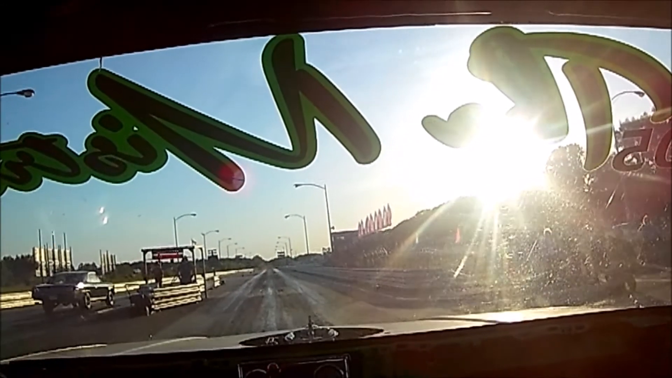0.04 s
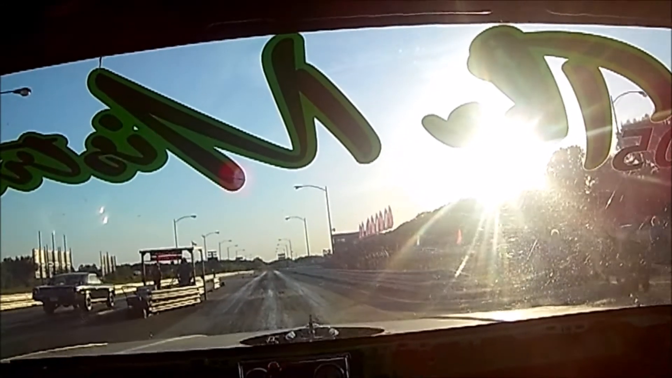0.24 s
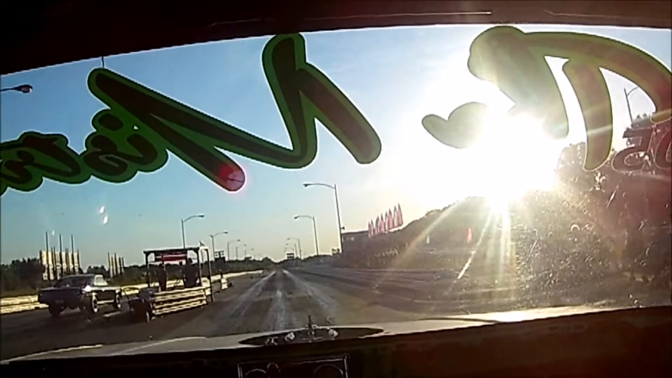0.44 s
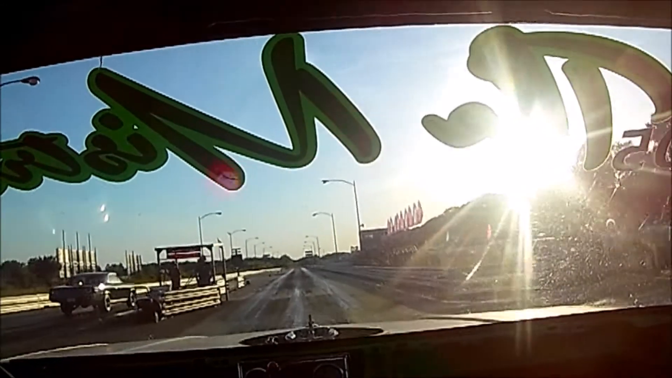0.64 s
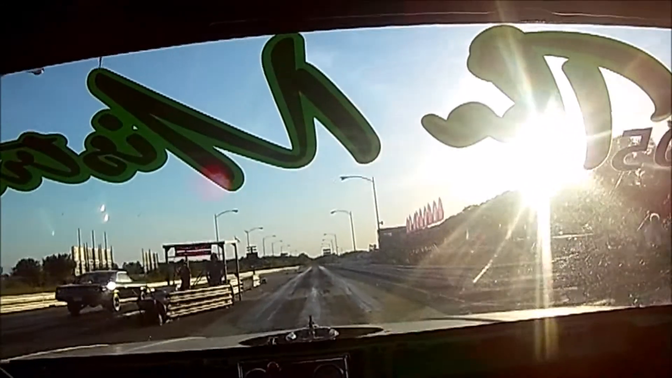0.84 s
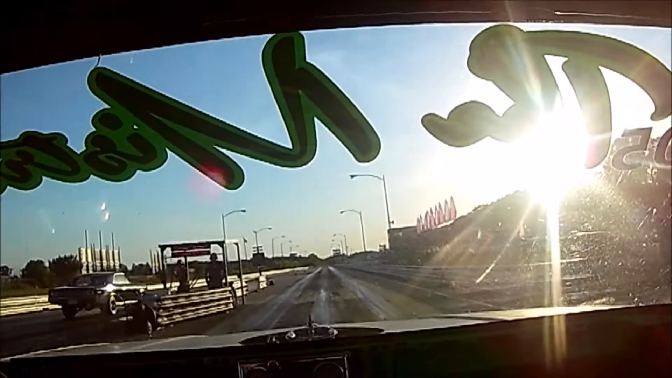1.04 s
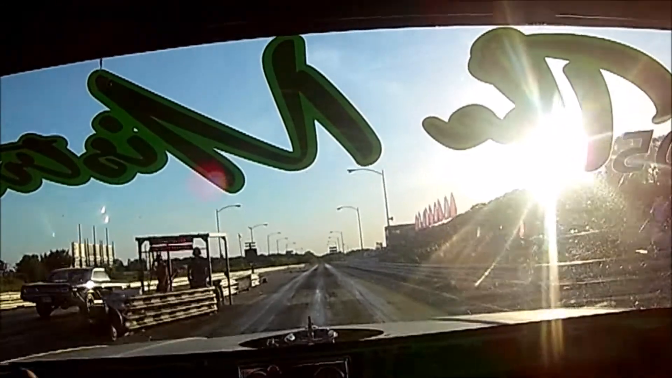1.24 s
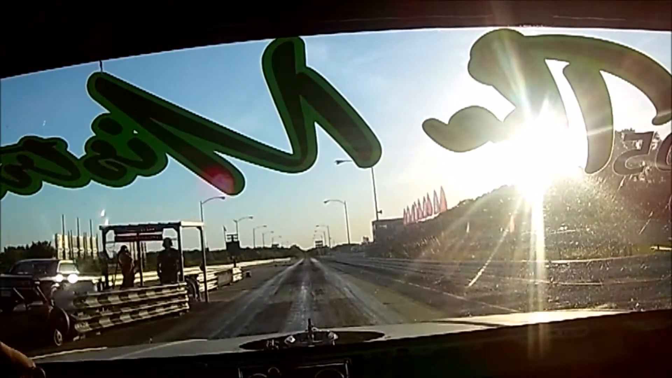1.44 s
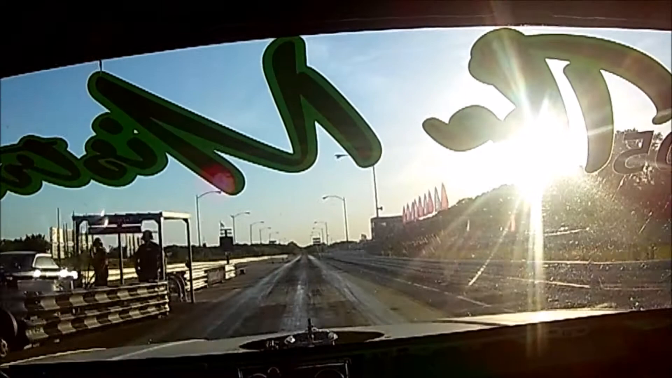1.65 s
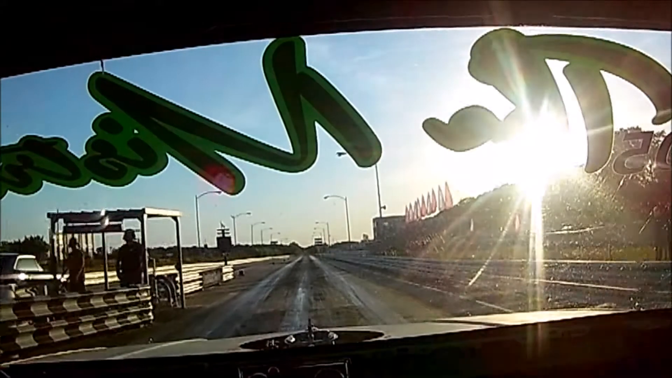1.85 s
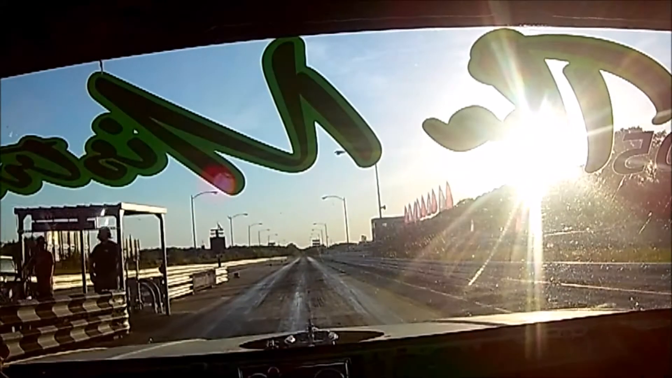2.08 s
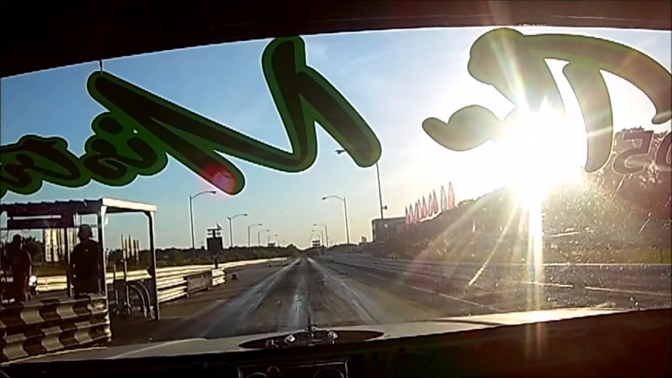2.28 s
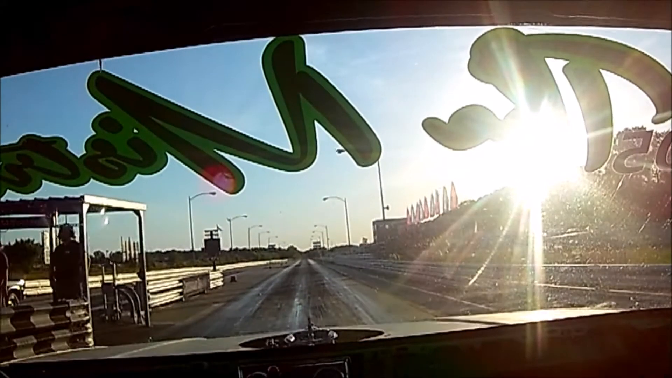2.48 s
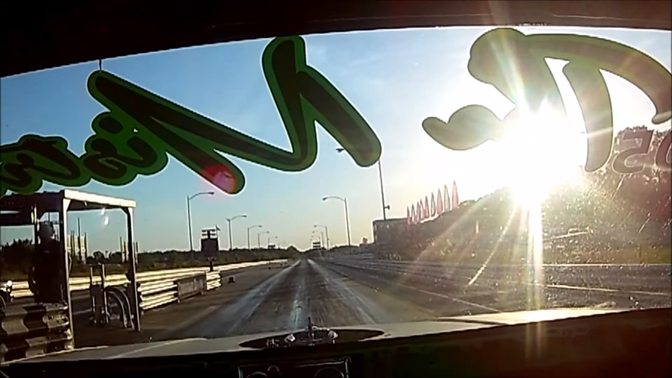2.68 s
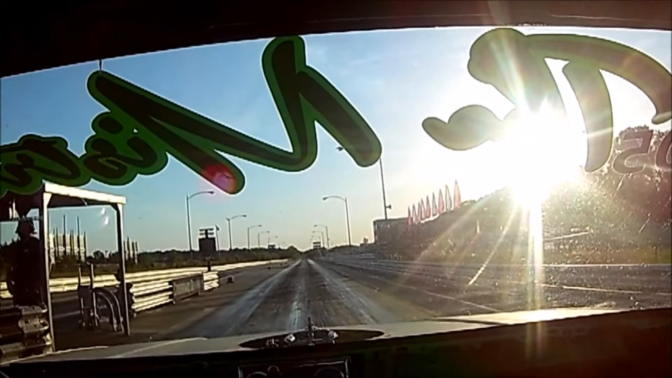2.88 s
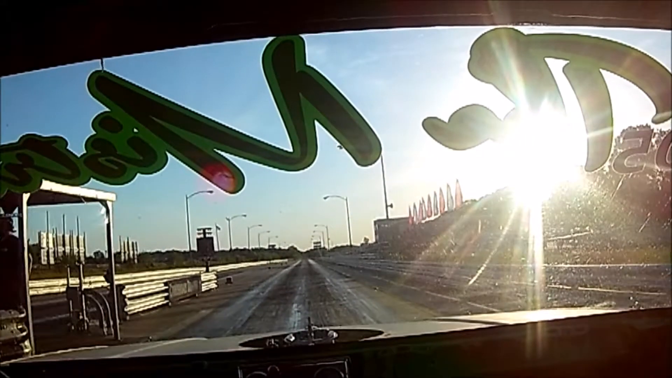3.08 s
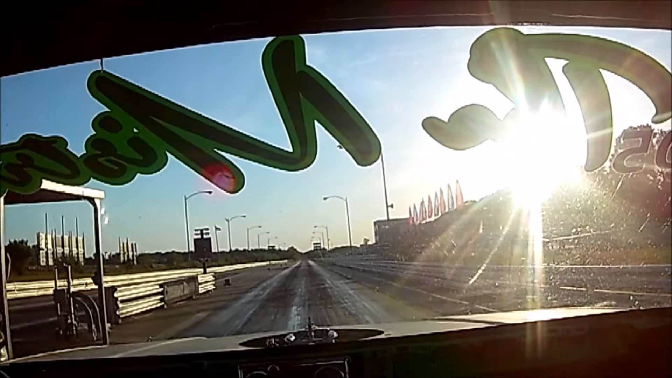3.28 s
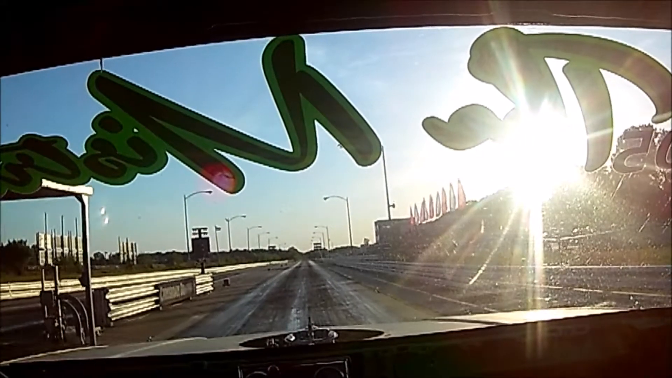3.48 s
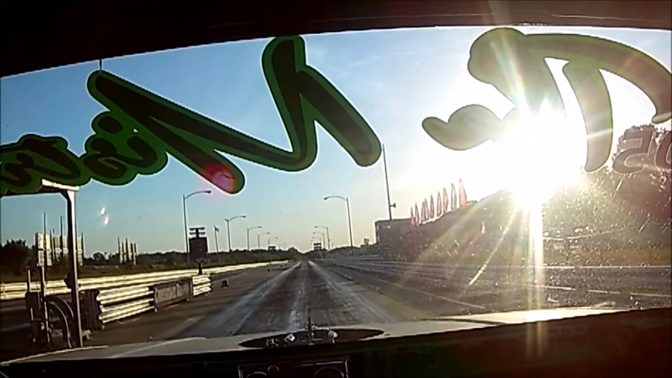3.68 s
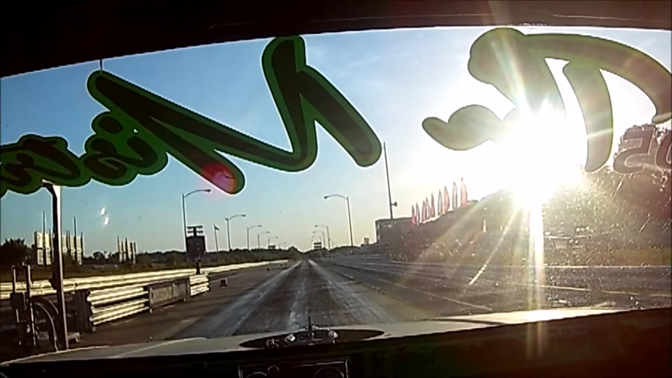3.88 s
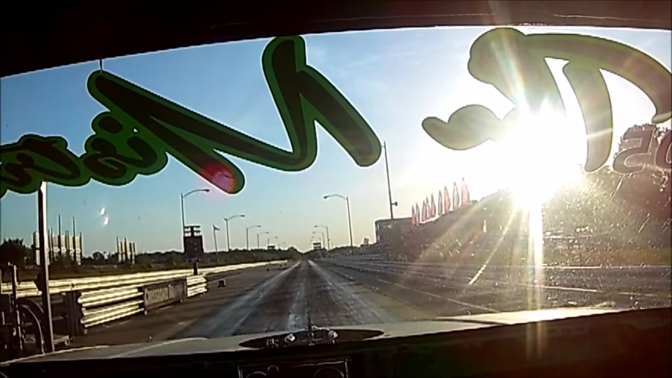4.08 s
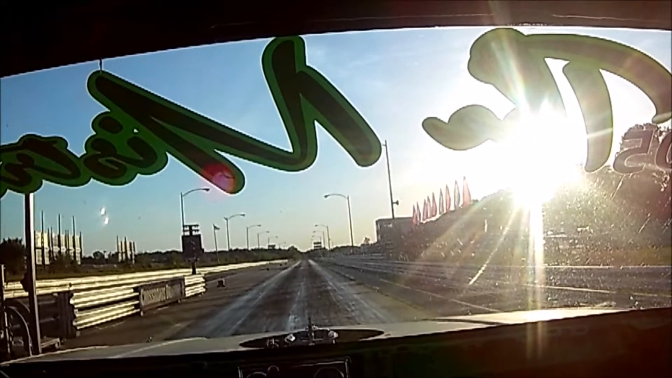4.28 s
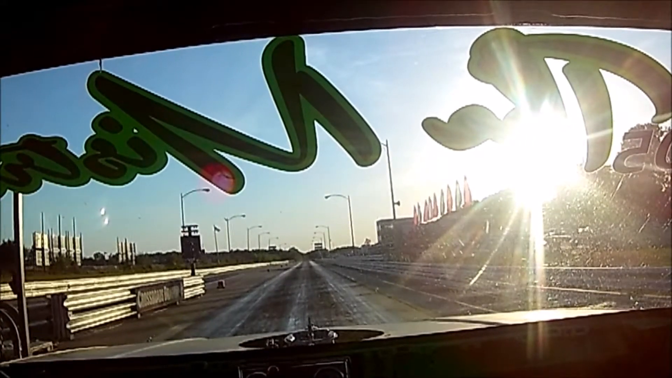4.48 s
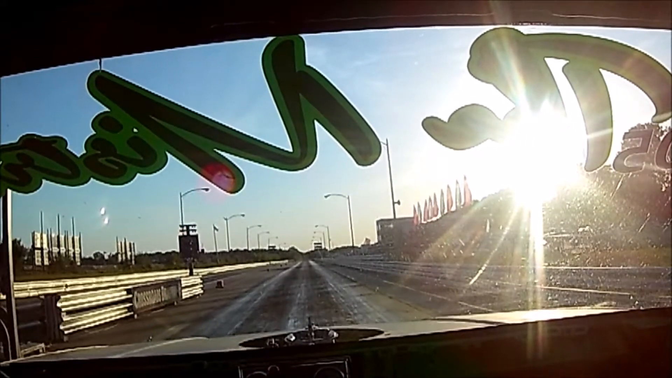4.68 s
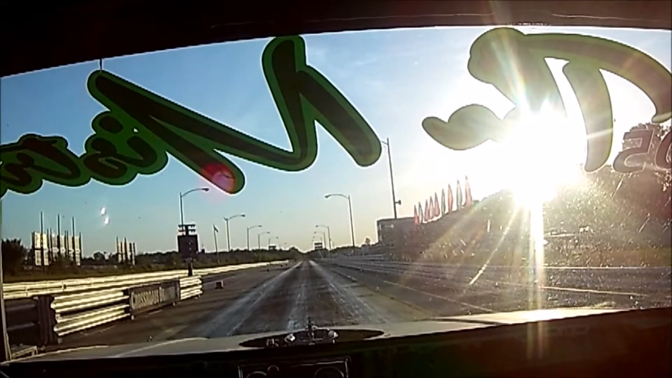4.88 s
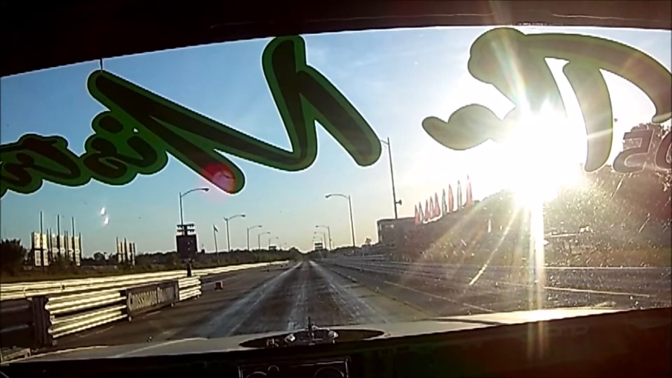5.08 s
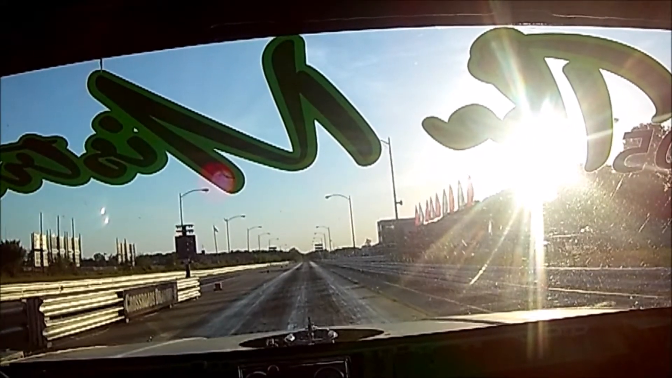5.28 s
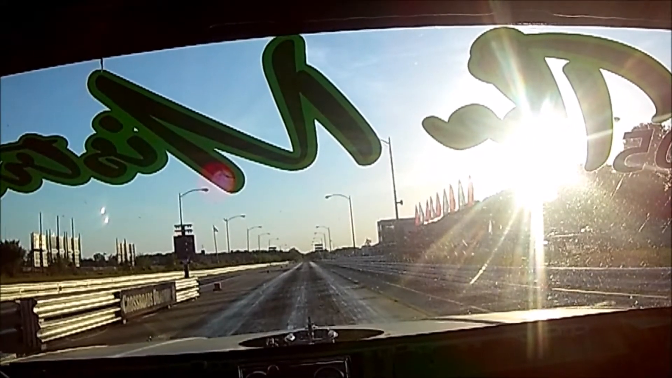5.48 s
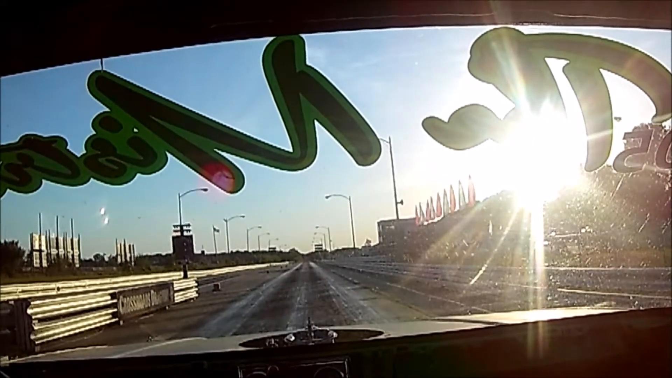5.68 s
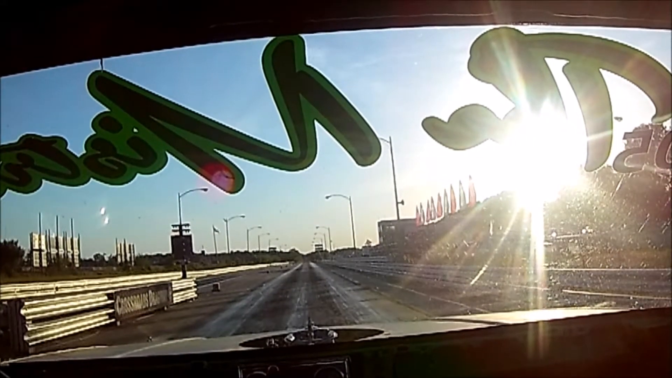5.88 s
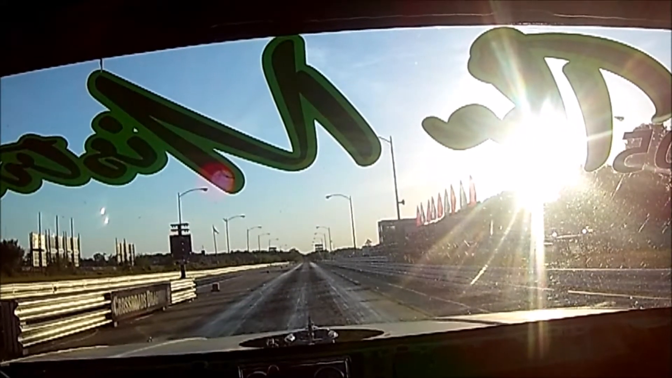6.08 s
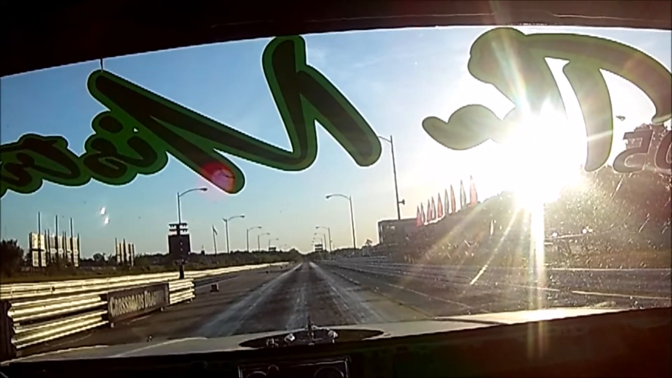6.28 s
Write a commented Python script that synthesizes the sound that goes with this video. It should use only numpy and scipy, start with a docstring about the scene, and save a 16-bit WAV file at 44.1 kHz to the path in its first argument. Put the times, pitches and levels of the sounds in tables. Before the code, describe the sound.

Inside a car on a drag strip, a big V8 with open exhausts roars loudly for about a second, dipping and rising in pitch with a brief tyre hiss. The throttle snaps shut, the revs tumble with heavy thumps and one dull pop, and a far quieter, uneven idle remains, booming and ticking. The close cabin microphone overloads on the loudest peaks.

```python
"""A big V8 with open exhausts, heard from the driver's seat at a drag strip.
It roars through the end of a burnout, built from steady tones plus cracks and puffs of gas at each firing.
At about 1.1 s the throttle shuts and the revs fall, with one pop in the pipe, to a rough, loping idle.
Off the throttle, uneven firings boom in the cabin, with a deep note, pipe burble and chuffs.
Behind them the valve train ticks as band-passed noise puffs, and the tyres scrub as a high hiss."""
import sys
import numpy as np
from scipy import signal
from scipy.fft import rfft, irfft
from scipy.io import wavfile
from scipy.ndimage import uniform_filter1d

SR = 44100
rng = np.random.default_rng(int(sys.argv[2]) if len(sys.argv) > 2 else 0)


def digitize_waveform(pressure):
    """Quantize a signal to 16-bit integers and store it at the path in sys.argv[1].

    Rows of a 2-D input are taken as channels; values are limited to [-1, 1].
    """
    field = np.atleast_2d(pressure).T
    bounded = np.clip(field, -1, 1)
    quanta = np.round(bounded * 32767).astype(np.int16)
    wavfile.write(sys.argv[1], SR, quanta)


N = 279594
T = np.arange(N) / SR  # time of every sample, s

# Engine speed in the burnout: time_s, firings_hz
BURNOUT_SPEED = [(0, 378), (.14, 354), (.3, 305), (.39, 297.5), (.58, 310), (.83, 314.5), (.9, 325),
                 (1.0, 347), (1.06, 354), (1.12, 338)]
# Engine speed at idle, which hunts a little: time_s, firings_hz
IDLE_SPEED = [(2.6, 60), (3.4, 64.03), (3.7, 59.88), (4.2, 58.82), (4.65, 61.4), (5.0, 60.5), (5.35, 62.52),
              (5.7, 59.5), (6.0, 59.37), (6.34, 66)]
# Exhaust tones under load: multiple_of_eight_cylinder_cycle, relative_level_db
EXHAUST_ORDERS = [(1, -31), (2, -22), (3, -8), (4, -22), (5, -6), (6, -21), (7, -23), (8, 0), (9, -15),
                  (10, -15), (11, -19), (12, -29), (13, -22), (14, -20), (15, -13), (16, -16), (17, -19),
                  (18, -18), (19, -20), (20, -11), (21, -10), (22, -19), (23, -20), (24, -21), (25, -12),
                  (26, -23), (27, -19), (28, -13), (29, -17), (30, -12), (31, -17), (32, -19), (33, -23),
                  (34, -21), (35, -17), (36, -8), (37, -14), (38, -10), (39, -17), (40, -20), (41, -11),
                  (42, -19), (43, -20), (44, -20), (45, -20), (46, -20)]
# Cylinders in firing order: strength_db, extra_path_to_cabin_s
CYLINDERS = [(0, 0.00063), (-1.5, 0), (-4, 0), (-7, 0.0016), (-1, 0.00057), (-7.5, 0.00099), (-14, 0.0015),
             (-4, 0)]
# How evenly the engine fires under load: time_s, share_of_rasp_power_that_is_clean_tone (0-1)
EVENNESS = [(0, .55), (.33, .4), (.52, .84), (.82, .84), (.9, .5), (1.04, .5), (1.12, .1)]
# How hard the engine works in the burnout: time_s, rasp_level_db (each layer adds a small trim)
EFFORT = [(0.0, -12.5), (0.208, -15.5), (0.372, -14.5), (0.498, -10.5), (0.87, -10), (0.914, -6),
          (1.06, -9)]
# Low tones in the burnout: time_s, low_orders_db, firing_note_db (each gets a small trim)
LOW_TONES = [(0.0, -8, -11.5), (0.074, -18, -17), (0.136, -8.5, -9), (0.17, -8.5, -15.5),
             (0.236, -15.5, -15.5), (0.626, -13, -13.5), (0.722, -21, -13.5), (0.744, -20, -12),
             (1.12, -13, -17.5)]

# Tone colours, the broad shape of each layer's spectrum: pitch_hz, level_db
ROAR_COLOUR = [(40, -18.5), (110, 2), (190, 3.5), (250, -4.5), (370, 4), (470, -11.5), (600, -1),
               (1100, -2.5), (1550, -1.5), (2100, -11.5), (2750, -19.5), (3500, -6), (4500, -17),
               (6200, -22.5), (7800, -41), (11500, -38.5), (15000, -59)]
BOOM_COLOUR = [(20, -45), (45, -14), (70, -18), (84, -8), (100, 4), (128, -1.5), (160, -8.5), (185, -5),
               (222, -22), (300, -45.5), (440, -39.5), (800, -90), (4000, -110)]
BURBLE_COLOUR = [(30, -60), (200, -26), (260, -8), (300, 0), (345, -1), (390, -1), (440, -17), (700, -40),
                 (4000, -100)]
CLATTER_COLOUR = [(200, -9.5), (450, -13), (730, -0.5), (930, -7.5), (1450, 0.5), (1720, -2), (2100, -10.5),
                  (2770, -17.5), (3550, -6), (4300, -15.5), (6000, -22.5), (7000, -28), (7600, -36),
                  (10000, -32), (14300, -37.5)]
DRONE_COLOUR = [(40, -0.5), (130, 1.5), (195, 1), (222, -11), (280, -9)]
# How the pipes colour the upper orders: pitch_hz, level_db
SNARL_COLOUR = [(420, 0), (585, -2.5), (760, 4), (1000, 0.5), (1400, -0.5), (1800, -2)]
# Peaks and dips of the cabin and its panels: pitch_hz, width_hz, gain_db
CABIN_RESONANCES = [(100.9, 4.4, 4.5), (130.64, 12.3, 9.5), (304, 48, 2.5), (547, 56, 6.5), (1127, 90, 5.5),
                    (1316, 29, -12), (1405, 99, 5.5), (1631, 48, 4), (2970, 340, -5), (3273, 65, 7),
                    (5190, 30, 2)]
# Cabin booms and a null that shape the firing note and its octave: pitch_hz, width_hz, gain_db
THROB_MODES = [(59.2, 6, 5), (97, 18, 17.5), (128.3, 7.6, 11.5), (250, 77, -17.5)]

# Tyre hiss as they bite and the car shoots forward: time_s, level_db
SCRUB_LEVEL = [(.75, -49), (1.0, -26), (1.2, -39), (1.45, -85)]
# Heavy lumps, a few cylinders that fire hard and thump the cabin: peak_s, boom_db, pipe_burble_db
LUMPS = [(1.115, -24, -20.5), (1.19, -14, -30), (1.275, -13, -34), (1.36, -13.5, -43), (1.45, -26, -34),
         (1.71, -20.5, -30.5), (2.15, -21, -51), (2.6, -21, -54), (2.94, -21.5, -46), (3.18, -23.5, -45),
         (3.31, -24, -39), (3.43, -19, -46), (3.58, -23, -39), (4.4, -24, -39), (4.78, -16, -40),
         (6.28, -23.5, -38.5)]
# Sharp chuffs from the pipes: peak_s, level_db
CHUFFS = [(2.024, -41), (2.849, -39), (3.02, -43), (3.105, -40), (3.311, -37), (3.567, -40.5),
          (3.631, -40.5), (3.834, -39.5), (4.539, -39.5), (4.693, -39), (4.778, -40), (4.957, -39),
          (5.058, -37.5), (5.16, -41.5), (5.301, -39), (5.553, -41), (6.116, -39.5), (6.18, -39.5),
          (6.284, -35.5)]
# Stumbles, where the engine misses and the level sags: middle_s, depth_db
STUMBLES = [(2.52, 4), (2.75, 3), (3.71, 2.5), (4.06, 3.5), (4.33, 1.5), (4.9, 1.5), (5.23, 1.5), (5.43, 2),
            (5.69, 1.5), (6.03, 1.5)]

# When the throttle starts to shut, and how long it takes
SHUT_S, CLOSING_S = 1.074, 0.079
# The revs drop sharply, then the flywheel coasts: both time constants, and the coasting share of the excess
DROP_S, COAST_S, COAST_SHARE = .065, .49, .5
# Once the throttle shuts the rasp steps down, then dies away
RASP_STEP_DB, RASP_STEP_S, RASP_FADE_DB_PER_S = 4, 0.0071, 56.5
# Basic level at idle, and the rise for every octave of revs above it
BOOM_DB, BOOM_DB_PER_OCTAVE = -24, 4.5
BURBLE_DB, BURBLE_DB_PER_OCTAVE = -41.5, 8.5
CHUFF_DB, CHUFF_DB_PER_OCTAVE = -42, 2.5
TICK_DB, TICK_DB_PER_OCTAVE = -40, 2
# The same for the firing note, then the level of its octave, all before the cabin's booms are added
THROB_DB, THROB_DB_PER_OCTAVE, THROB_OCTAVE_DB = -40.5, 5, -39
# How much of the chuffs' power swing and of the lope the ticking follows
TICK_CHUFF_SHARE, TICK_LOPE_SHARE = 0.31, 0.85
# The lope's flutter: its rate, how far that wanders, and its depth in each layer
LOPE_HZ, LOPE_WANDER_TURNS = 11.3, .2
BOOM_LOPE_DB, BURBLE_LOPE_DB, CHUFF_LOPE_DB = 1.3, 1.9, 1.5
LUMP_RISE_S, LUMP_FALL_S = 0.024, 0.023
CHUFF_RISE_S, CHUFF_FALL_S = 0.017, 0.023
STUMBLE_S = 0.032
EDGE_HZ = 14800  # top of the sound's band


def amp(db):
    """Turns decibels into gain."""
    return 10 ** (np.asarray(db) / 20)


def evened(x):
    """Scales a sound to an average (rms) level of 1."""
    return x / np.sqrt(np.mean(x ** 2) + 1e-20)


def steadied(x, span_s):
    """Keeps the level near rms 1 all along, judged over about span_s at a time."""
    size = max(int(span_s * SR), 8)
    power = uniform_filter1d(uniform_filter1d(x ** 2, size), size)
    return x / np.sqrt(abs(power) + 1e-12)


def curve(rows, column=1):
    """Draws straight lines through one column of a table, with a value at every sample."""
    rows = np.array(rows, float)
    return np.interp(T, rows[:, 0], rows[:, column])


def drift(hz):
    """Random wandering of rms 1, with little change faster than hz."""
    f = np.fft.rfftfreq(N, 1 / SR)
    return evened(irfft(rfft(rng.standard_normal(N)) * np.exp(-(f / hz) ** 2), N))


def swell(peak_s, rise_s, fall_s):
    """A smooth bump of height 1 at peak_s."""
    width_s = np.where(T < peak_s, rise_s, fall_s)
    return np.exp(-.5 * np.minimum(((T - peak_s) / width_s) ** 2, 100))


def cabin(x, colour):
    """Filters a sound with a broad colour and the cabin's resonances on top."""
    size = 16384
    f = np.fft.rfftfreq(size, 1 / SR)
    hz, level_db = np.transpose(colour)
    db = np.interp(np.log(f + 1), np.log(hz), level_db)
    for centre_hz, width_hz, gain_db in CABIN_RESONANCES:
        db = db + gain_db / (1 + (2 * (f - centre_hz) / width_hz) ** 2)
    # folding the cepstrum makes the filter respond only after each sound, never before it
    cepstrum = irfft(np.log(amp(db)))
    cepstrum[1:size // 2] *= 2
    cepstrum[size // 2 + 1:] = 0
    response = irfft(np.exp(rfft(cepstrum)))[:size // 2]
    return signal.oaconvolve(x, response)[:N]


def echoes(x, t60_s, wet_db):
    """Scattered reflections off glass and sheet metal: gliding tones swell and fade in them."""
    t = np.arange(SR // 5) / SR
    hits = rng.random(len(t)) < .05
    taps = rng.standard_normal(len(t)) * hits * amp(-60 * t / t60_s)
    return x + amp(wet_db) * signal.oaconvolve(x, taps / np.linalg.norm(taps))[:N]


def throttle():
    """How open the throttle is, 0-1: wide open, then quickly shut."""
    return np.clip(1 - (T - SHUT_S) / CLOSING_S, 0, 1)


def speed():
    """Firings per second: driven through the burnout, then coasting down to the idle."""
    age, idle = np.maximum(T - BURNOUT_SPEED[-1][0], 0), curve(IDLE_SPEED)
    coasting = COAST_SHARE * np.exp(-age / COAST_S)
    dropping = (1 - COAST_SHARE) * np.exp(-age / DROP_S)
    return idle + (curve(BURNOUT_SPEED) - idle) * (coasting + dropping)


def revs():
    """Octaves of engine speed above the idle."""
    return np.log2(speed() / curve(IDLE_SPEED))


def crank():
    """Running count of firings; the speed trembles slightly."""
    return np.cumsum(speed() * (1 + .002 * drift(40))) / SR


def rasp_db():
    """The rasp follows the effort and dies away when the throttle shuts."""
    age = np.maximum(T - SHUT_S, 0)
    step_db = RASP_STEP_DB * np.minimum(age / RASP_STEP_S, 1)
    return curve(EFFORT) - step_db - RASP_FADE_DB_PER_S * age


def lope(depth_db):
    """Unevenness of the idle in dB: a wandering flutter, and a sag at each stumble."""
    wave = np.sin(2 * np.pi * (LOPE_HZ * T + LOPE_WANDER_TURNS * drift(5.3)))
    flutter = evened(wave + .5 * drift(22))
    sag_db = sum(db * swell(s, STUMBLE_S, STUMBLE_S) for s, db in STUMBLES)
    return depth_db * flutter - sag_db


def pulses(firings, pattern, scatter_db, jitter_s):
    """One click per firing: each cylinder has its own strength and path, and no two burns are alike."""
    at = np.flatnonzero(np.diff(np.floor(firings)) > 0)
    cylinder = firings[at + 1].astype(int) % len(CYLINDERS)
    strength_db, path_s = np.array(CYLINDERS)[cylinder].T
    burn, late = rng.standard_normal((len(at), 2)).T
    delay = np.round((path_s + jitter_s * late) * SR).astype(int)
    place = np.clip(at + delay, 0, N - 1)
    # pattern sets how much of the cylinders' difference in strength is heard
    level_db = pattern * strength_db + scatter_db * np.clip(burn, -2, 1.5)
    return np.bincount(place, amp(level_db), N)


def puffs(train, decay_s, steady):
    """Each pulse lets out a dying puff of turbulent gas (noise) over a steady rush."""
    gate = signal.lfilter([1], [1, -np.exp(-1 / (decay_s * SR))], train)
    return (steadied(gate, 0.037) + steady) * rng.standard_normal(N)


def scrub():
    """Rubber tearing on the track: a band of noise with a flickering level."""
    band = signal.butter(2, [4500, 6800], "band", fs=SR, output="sos")
    hiss = signal.sosfilt(band, rng.standard_normal(N))
    return evened(hiss) * amp(curve(SCRUB_LEVEL) + 2 * drift(80))


def clatter(firings):
    """Loping chuffs that catch quickly and die slowly, over steadier valve-train ticking."""
    steady_power = amp(CHUFF_DB + CHUFF_DB_PER_OCTAVE * revs() + lope(CHUFF_LOPE_DB)) ** 2
    chuff_power = sum(amp(db) ** 2 * swell(s, CHUFF_RISE_S, CHUFF_FALL_S) for s, db in CHUFFS)
    power = steady_power + chuff_power

    train = pulses(firings, pattern=0.52, scatter_db=7.0, jitter_s=.0025)
    gas = puffs(train, decay_s=0.021, steady=0.91)
    chuffs = steadied(cabin(gas, CLATTER_COLOUR), 0.035) * np.sqrt(power)

    # the valves tick twice per firing
    valves = pulses(2 * firings, pattern=0.35, scatter_db=6.5, jitter_s=0.00082)
    ticks = steadied(cabin(puffs(valves, decay_s=0.0072, steady=3.2), CLATTER_COLOUR), 0.043)
    tick_db = TICK_DB + TICK_DB_PER_OCTAVE * revs()
    tick_db = tick_db + TICK_LOPE_SHARE * lope(CHUFF_LOPE_DB) + 1.7 * drift(36)
    ticks = ticks * amp(tick_db) * (power / steady_power) ** TICK_CHUFF_SHARE

    # the pipes carry the middle, the valve train the treble
    low_pass = signal.butter(3, 2700, fs=SR, output="sos")
    middle = amp(0.34) * signal.sosfiltfilt(low_pass, chuffs)
    treble = ticks - signal.sosfiltfilt(low_pass, ticks)
    return middle + treble


def afterfire(start_s, level_db, pitch_hz, decay_s):
    """Unburnt fuel pops once in the pipe as the revs fall: a short burst of band-passed noise."""
    age = np.maximum(T - start_s, 0) / decay_s
    band = signal.butter(2, [0.77 * pitch_hz, 1.06 * pitch_hz], "band", fs=SR, output="sos")
    noise = signal.sosfilt(band, rng.standard_normal(N))
    return evened(noise) * amp(level_db) * age * np.exp(1 - age)


def throb(firings):
    """The firing rate and its octave, deep notes that sink with the revs through the cabin's booms."""
    def cabin_db(hz):
        """Gain of the cabin's booms and null at a given pitch."""
        return sum(db / (1 + (2 * (hz - centre) / width) ** 2) for centre, width, db in THROB_MODES)
    turns, hz = firings + 0.052 * drift(5.6), speed()
    note_db = THROB_DB + THROB_DB_PER_OCTAVE * revs() + cabin_db(hz) + 4.1 * drift(8.9)
    octave_db = THROB_OCTAVE_DB + cabin_db(2 * hz) + lope(BOOM_LOPE_DB)
    note = evened(np.sin(2 * np.pi * turns)) * amp(note_db)
    octave = evened(np.sin(2 * np.pi * 2 * turns)) * amp(octave_db)
    return (note + octave) * (1 - throttle())


def boom(firings):
    """Off the throttle, uneven firings thump the cabin's low resonances and burble in the pipes."""
    train = pulses(firings, pattern=0.75, scatter_db=1.5, jitter_s=.0017)
    gas = evened(puffs(train, decay_s=0.011, steady=0.21))
    drive = steadied(train, 0.04) + 1.06 * gas
    thump_power = amp(BOOM_DB + BOOM_DB_PER_OCTAVE * revs() + lope(BOOM_LOPE_DB)) ** 2
    burble_power = amp(BURBLE_DB + BURBLE_DB_PER_OCTAVE * revs() + lope(BURBLE_LOPE_DB)) ** 2
    for peak_s, thump_db, burble_db in LUMPS:
        lump = swell(peak_s, LUMP_RISE_S, LUMP_FALL_S)
        thump_power = thump_power + amp(thump_db) ** 2 * lump
        burble_power = burble_power + amp(burble_db) ** 2 * lump
    thump = steadied(cabin(drive, BOOM_COLOUR), 0.029) * np.sqrt(thump_power)
    burble = steadied(cabin(drive, BURBLE_COLOUR), 0.37) * np.sqrt(burble_power)
    return (thump + burble) * np.sqrt(1 - throttle() ** 2)


def roar(firings):
    """Cracks and puffs of gas from the open pipes."""
    even = curve(EVENNESS)
    train = pulses(firings, pattern=1, scatter_db=2, jitter_s=.00005)
    gas = steadied(puffs(train, decay_s=0.0068, steady=1.0), 0.047)
    # the steep shock fronts repeat cycle after cycle and carry the tones up into the treble
    cracks = pulses(firings, pattern=0.71, scatter_db=3.5, jitter_s=.00001)
    high_pass = signal.butter(3, 1700, "high", fs=SR, output="sos")
    fronts = signal.sosfilt(high_pass, echoes(cracks, t60_s=0.18, wet_db=10.0))
    drive = np.sqrt(1 - even) * gas + np.sqrt(even) * steadied(fronts, .1)
    # the coloured gas alone sets the reference level
    unit = np.std(cabin(gas, ROAR_COLOUR))
    fade = np.interp(T, [1.33, 1.5], [1, 0])
    return cabin(drive, ROAR_COLOUR) / unit * amp(rasp_db() + 1.65) * fade


def exhaust_tone(firings):
    """Clean tones under load; the unequal banks put strong tones between the firing harmonics."""
    order, level_db = np.transpose(EXHAUST_ORDERS)
    # 0: below the firing note, 1: the firing note and its neighbours, 2: above them
    group = (order >= 8).astype(int) + (order > 10)
    cycle = firings / len(CYLINDERS) + 0.00035 * drift(56)
    tone = np.zeros((3, N))
    for k, db, g, start in zip(order, level_db, group, rng.random(len(order))):
        tone[g] += amp(db) * np.cos(2 * np.pi * (k * cycle + start))
    drone = steadied(cabin(tone[0], DRONE_COLOUR), 0.034) * amp(curve(LOW_TONES, column=1) - 1.6)
    note = evened(tone[1]) * amp(curve(LOW_TONES, column=2) + 0.93)
    snarl = cabin(echoes(tone[2], t60_s=.1, wet_db=-12), SNARL_COLOUR)
    snarl = steadied(snarl, .1) * amp(rasp_db() - 1) * np.sqrt(curve(EVENNESS))
    return (drone + note + snarl) * throttle()


def scene():
    """One crankshaft drives every engine layer; the tyres and the single pop are added."""
    firings = crank()
    idling = clatter(firings) + throb(firings) + boom(firings)
    loaded = scrub() + roar(firings) + exhaust_tone(firings)
    pop = afterfire(start_s=1.31, level_db=-26, pitch_hz=656, decay_s=0.01)
    return (idling + pop + loaded)[None]


def record(dry):
    """The overloaded microphone flattens the loudest peaks near full scale; then the top is cut off."""
    clipped = dry / (1 + dry ** 12) ** (1 / 12)
    low_pass = signal.firwin(255, EDGE_HZ, window=("kaiser", 8), fs=SR)
    return signal.oaconvolve(clipped, low_pass[None], "same")


dry = scene()
out = record(dry)
digitize_waveform(out)
```